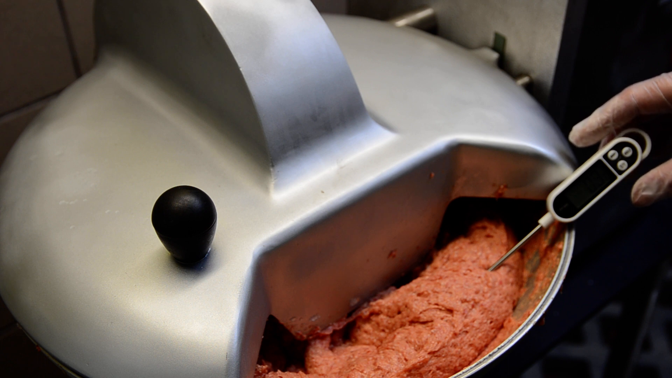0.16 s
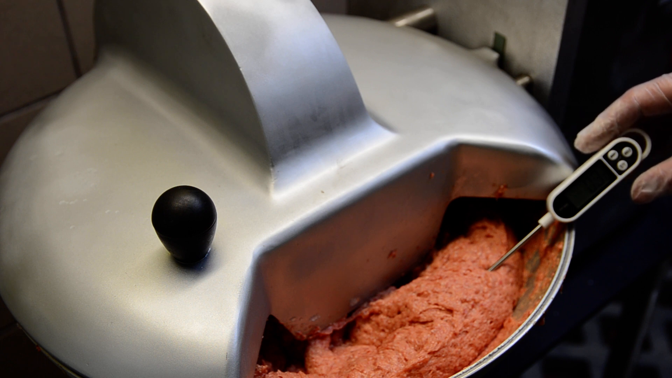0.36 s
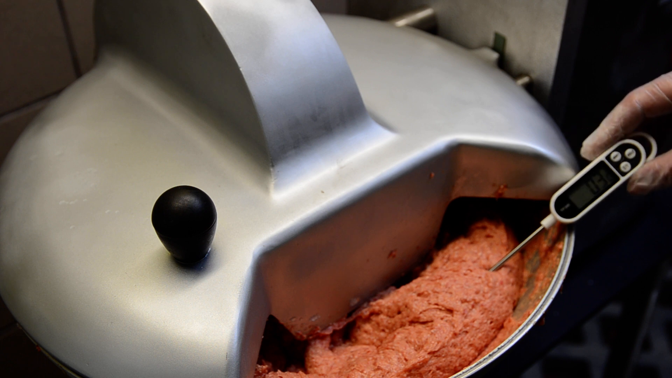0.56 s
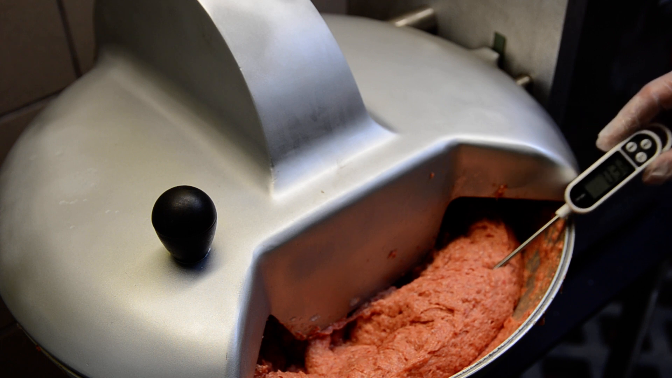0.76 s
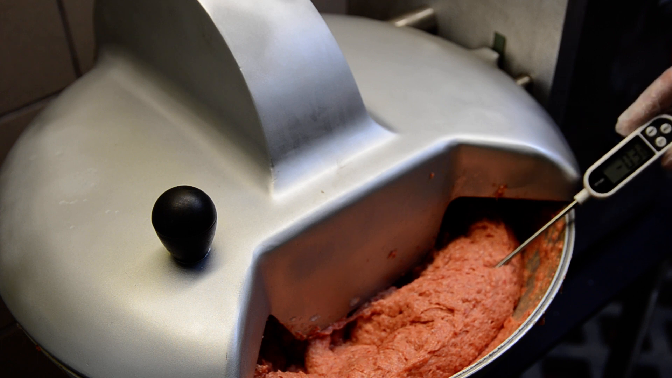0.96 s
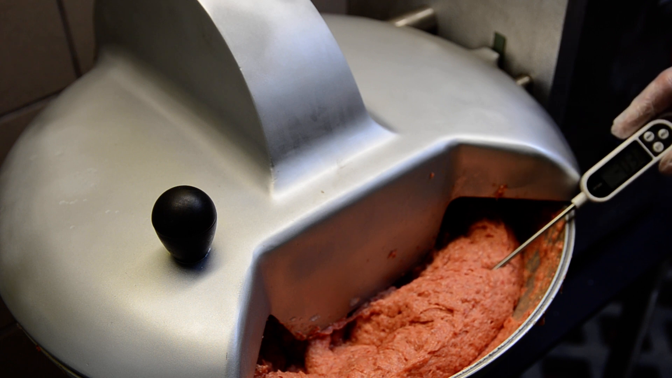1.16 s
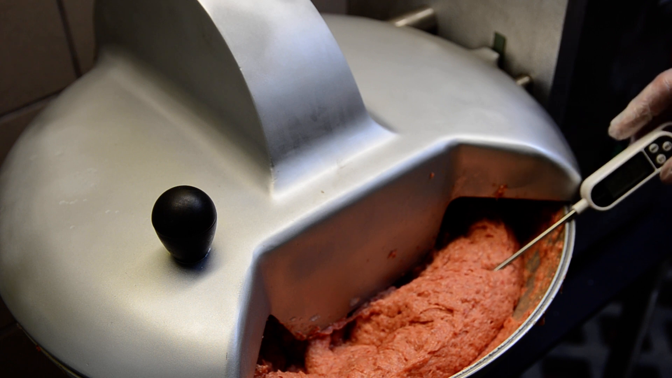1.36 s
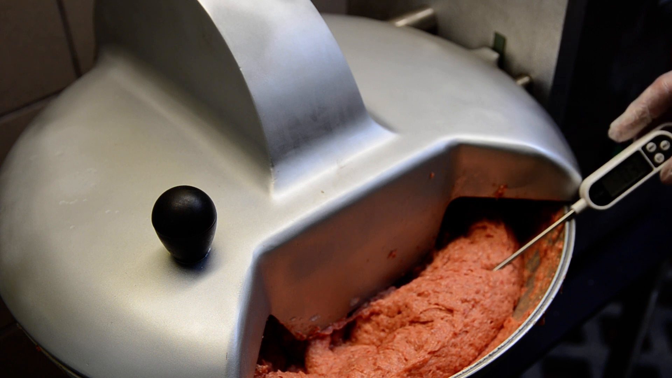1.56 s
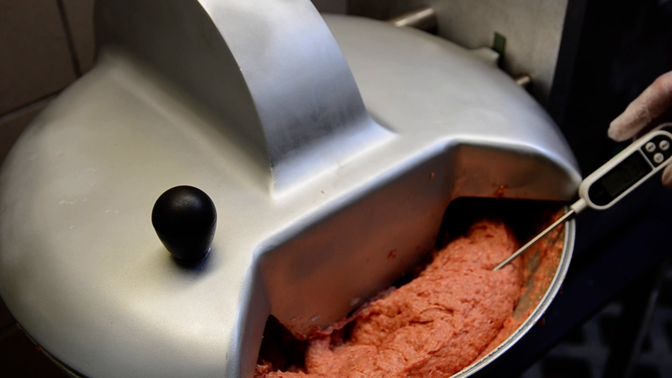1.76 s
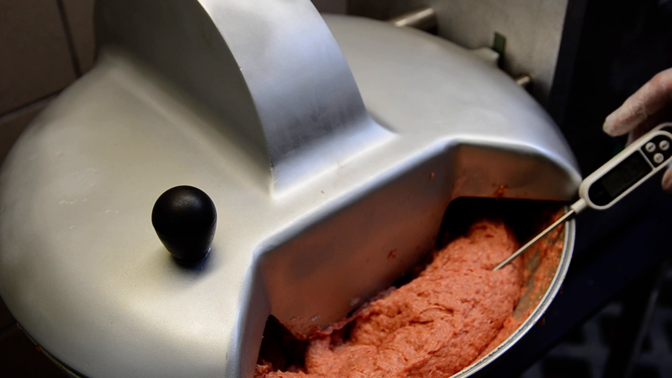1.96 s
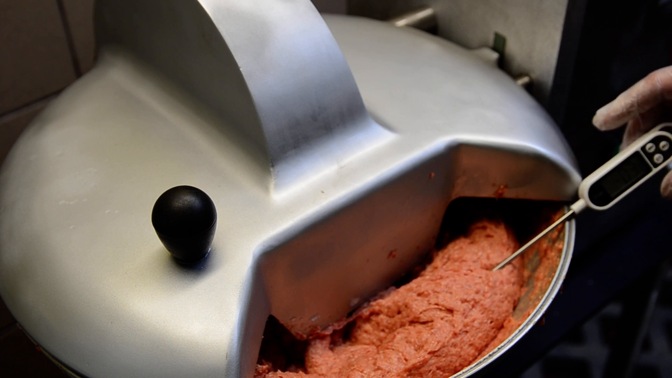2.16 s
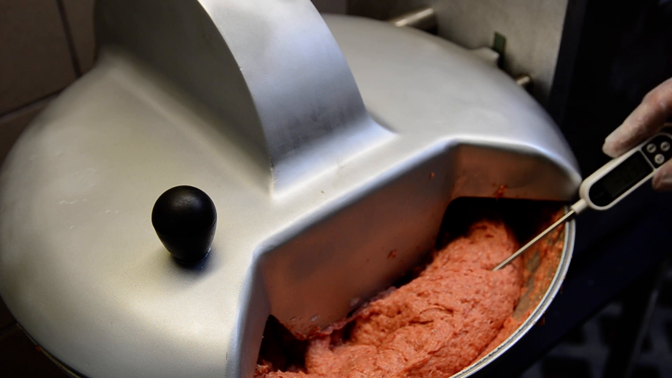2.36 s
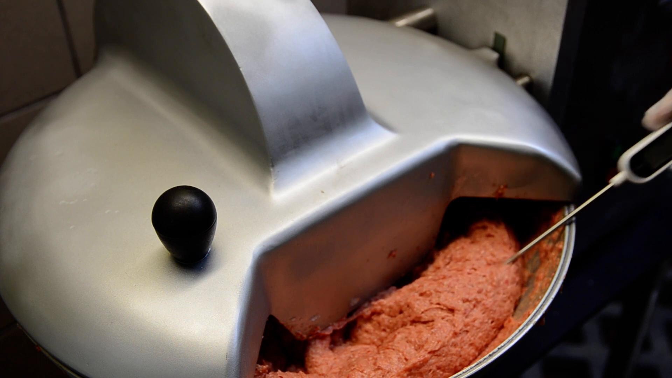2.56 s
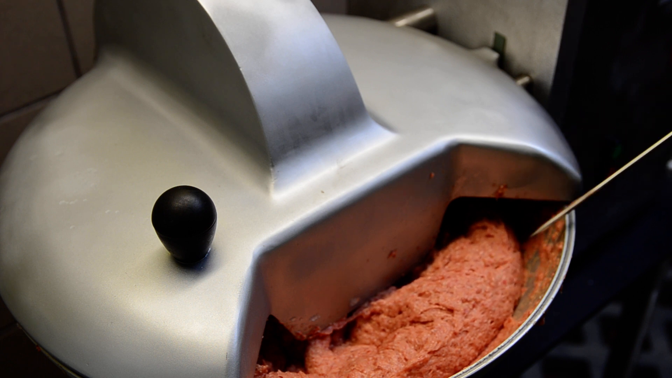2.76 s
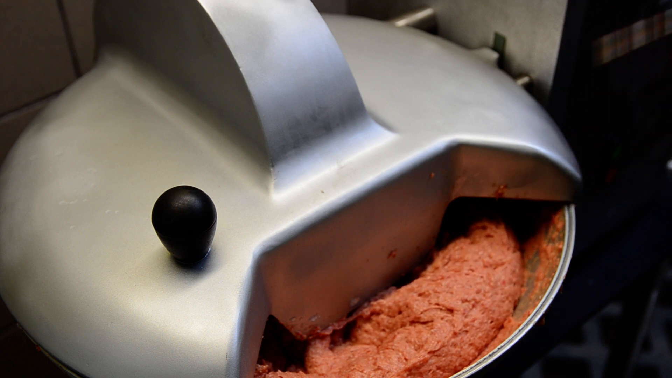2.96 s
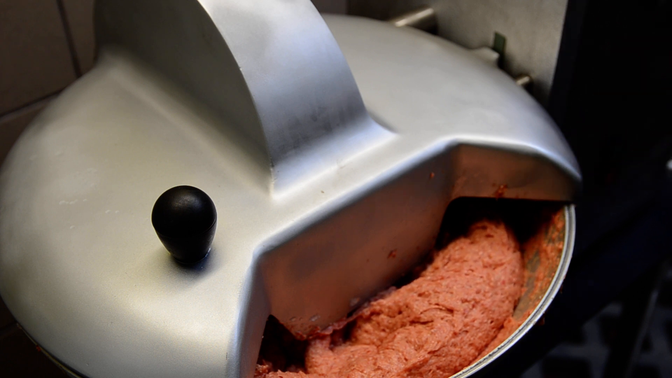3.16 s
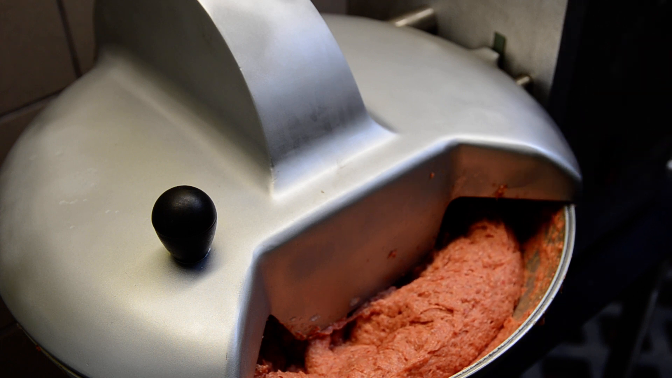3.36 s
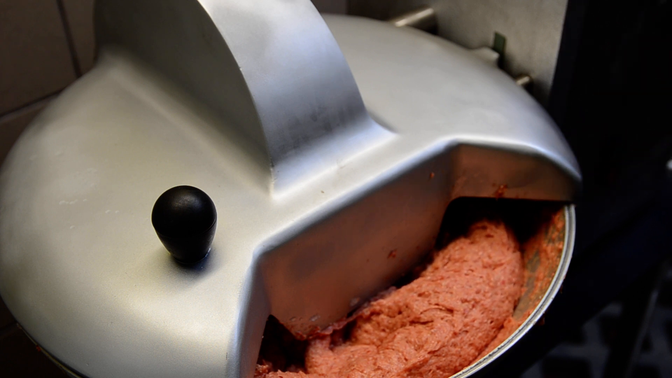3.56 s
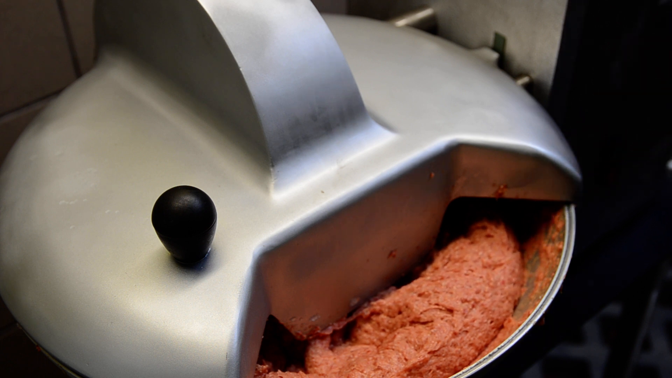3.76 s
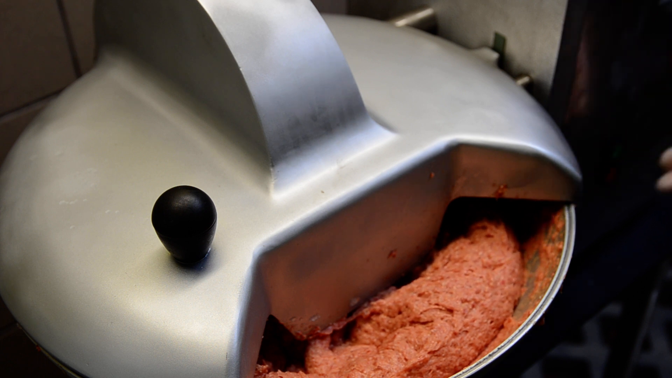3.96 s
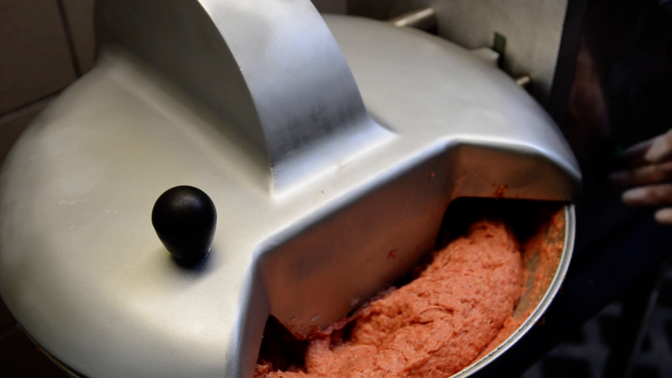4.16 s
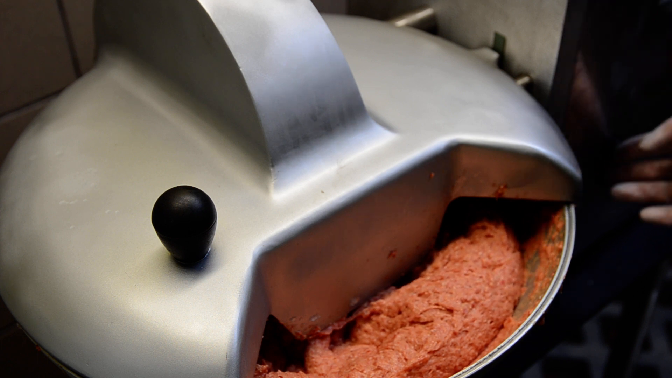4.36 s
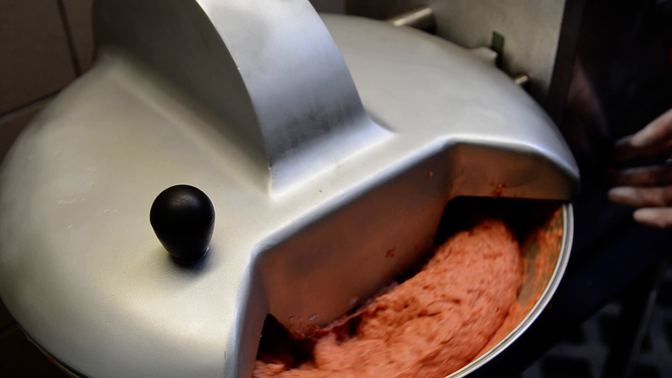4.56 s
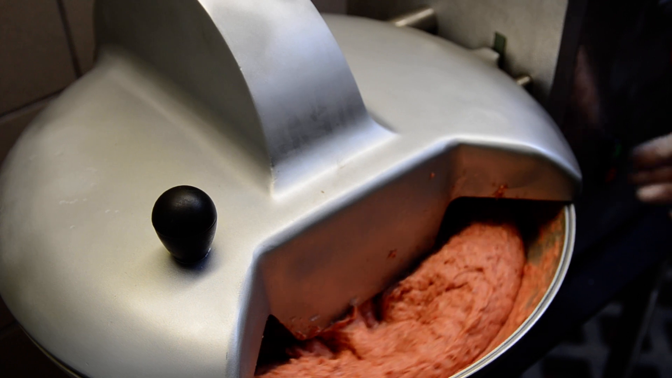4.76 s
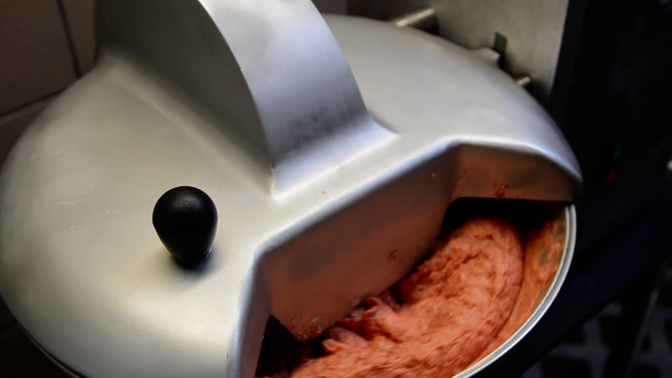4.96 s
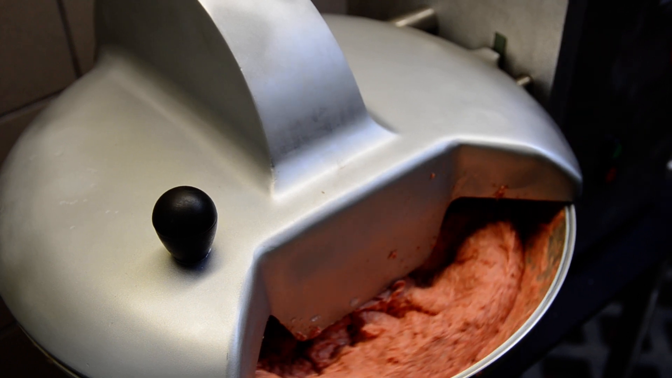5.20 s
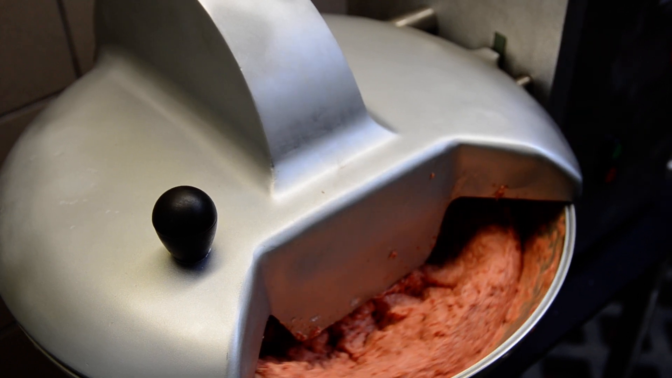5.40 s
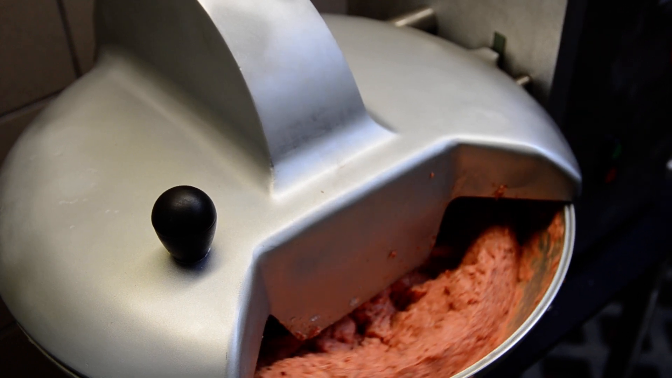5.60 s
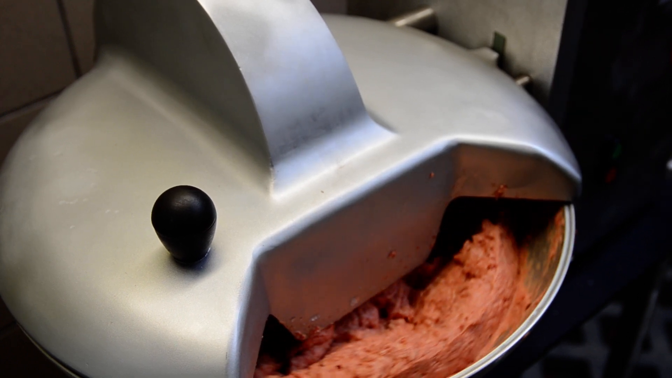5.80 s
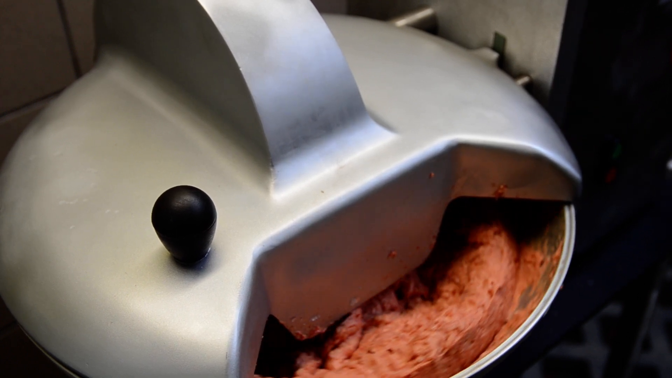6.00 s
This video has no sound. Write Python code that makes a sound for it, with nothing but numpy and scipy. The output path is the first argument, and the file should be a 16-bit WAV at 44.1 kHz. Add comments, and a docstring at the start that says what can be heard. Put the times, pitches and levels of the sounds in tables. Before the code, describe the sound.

Low airy drone first, almost still, with small ticks and a brief far bird warble. One small double tap on a thermometer, then a cluster of soft knocks as it comes to rest on steel. A barely audible button creak leads to a heavy clunk; the cutter's gears instantly roar, its housing and lid ringing harshly, with wet mince hissing underneath. Close microphone, short hard-walled room reverberation.

```python
"""Ventilation drones and a low hum wavers throughout: noise shaped in spectrum and passed through resonances.
Over them fall small dry ticks, band-limited noise bursts, and a far bird warbles in gliding sines.
A probe is tapped, then laid on a steel table: decaying modes struck by noise bursts, with unpitched cracks.
The button of a bowl cutter creaks; a faint dull noise leads to the drive's clunk and squeal; the hum grows.
Rattling gears ring the steel housing and lid while knives and mince hiss and spatter to the end."""
import sys
import numpy as np
from scipy import signal
from scipy.fft import rfft, irfft
from scipy.io import wavfile
from scipy.ndimage import uniform_filter1d

SR = 44100
rng = np.random.default_rng(int(sys.argv[2]) if len(sys.argv) > 2 else 0)


def undo_db(level):
    """Turn decibels back into plain size, where 20 dB means ten times bigger."""
    steps = np.asarray(level, float) / 20
    return 10 ** steps


def wav_out(sig):
    """Save sig, one row per channel (or a flat mono array), as 16-bit PCM at SR to the path in sys.argv[1]."""
    wavfile.write(sys.argv[1], SR, np.round(np.clip(np.atleast_2d(sig).T, -1, 1) * 32767).astype(np.int16))


N = 266364
T = np.arange(N) / SR

# Modes of the cutter housing. Each row: frequency in Hz, typical rms level while running in dB.
HOUSING_MODES = [(132, -43.5), (151, -44), (182, -41), (223, -38.5), (261, -38.5), (336, -45), (409, -52),
                 (450, -50.5), (568, -40), (608, -54), (676, -77), (721, -42.5), (821, -34.5), (902, -22),
                 (923, -22.5), (985, -27.5), (1031, -28.5), (1058, -29), (1096, -26), (1130, -26.5),
                 (1216, -36), (1265, -29.5), (1330, -29.5), (1402, -32), (1448, -40)]
# Modes of the cutter lid. Each row: frequency in Hz, typical rms level while running in dB.
LID_MODES = [(1577, -36.5), (1704, -30), (1766, -35), (1898, -29), (2013, -35), (2064, -33.5),
             (2161, -35.5), (2213, -36), (2304, -30.5), (2492, -39.5), (2568, -33.5), (2641, -37),
             (2719, -35.5), (2748, -38.5), (2880, -38), (3004, -41.5), (3114, -44.5), (3171, -47),
             (3292, -51), (3362, -56), (3669, -68), (3787, -49.5), (3863, -63), (4097, -67), (4194, -50.5),
             (4264, -65.5), (4323, -62), (4468, -71)]
# Spectrum shape of the gear roar. Each row: frequency in Hz, relative density in dB per Hz.
ROAR_SPECTRUM = [(59, -49), (100, -43), (232, -21), (380, -24.5), (670, -11.5), (742, -13), (911, -5.5),
                 (1200, -11.5), (1380, -11), (1500, -13), (2260, -12.5), (2820, -18.5), (3530, -28),
                 (4190, -27), (6000, -58), (7800, -77.5), (13200, -120)]
# Spectrum shape of knives and mince. Each row: frequency in Hz, relative density in dB per Hz.
MINCE_SPECTRUM = [(2710, -29), (4600, -5), (5220, -2.5), (5840, -11), (6270, -10.5), (6870, -11),
                  (9660, -13.5), (13600, -16.5), (15500, -23)]
# Start of the drive: the first row is a faint dull noise just before the clunk, the others the clunk itself.
# Each row: start in seconds, direct peak in dB, burst decay in ms, brightness in dB per octave.
DRIVE_START = [(4.527, -26.5, 11, -9), (4.540, -2.5, 7, 0), (4.551, -13, 4, -2.5), (4.578, -22, 9.3, 2)]
# Modes of the cutter frame. Each row: frequency in Hz, relative peak in dB, 60 dB decay time in seconds.
FRAME_MODES = [(227, -10.5, 0.15), (258, -8.5, 0.18), (335, -9, 0.055), (445, 4, 0.041), (482, 3.5, 0.033),
               (660, -13.5, 0.047), (863, 1.5, 0.028), (1230, -6, 0.023), (1418, -2, 0.026),
               (2037, -6.5, 0.021), (5000, -36, 0.042), (7850, -28, 0.023), (9140, -28, 0.058)]
# Squeal of the slipping drive: start in seconds, frequency in Hz, length in ms, peak in dB.
DRIVE_SLIP = (4.567, 3765.5, 16, -32)
# Push button creaking under the finger: start in seconds, length in seconds, frequency in Hz, rms level in dB.
BUTTON_CREAK = (4.422, .065, 1800, -60)
# Probe coming to rest. Each row: start in seconds, direct peak in dB, contact decay in ms,
# brightness in dB per octave.
TABLE_KNOCKS = [(3.315, -29.5, 28, 2.5), (3.327, -32, 15, -1.5), (3.376, -39, 7.3, -2.5),
                (3.394, -38.5, 8.9, -1)]
# Modes of the steel table. Each row: frequency in Hz, relative peak in dB, 60 dB decay time in seconds.
TABLE_MODES = [(180, -2.5, 0.11), (222, -4.5, 0.16), (470, -10.5, 0.073), (542, -9, 0.082),
               (807, 2.5, 0.071), (950, -25, 0.055), (1390, -10, .05), (1770, -5.5, 0.028),
               (2020, -6.5, 0.035), (2650, -19, .02), (3460, -20, .015), (3820, -17, 0.02),
               (4170, -18, 0.045), (4450, -22, .02)]
# Taps on the probe. Each row: start in seconds, direct peak in dB, contact decay in ms.
PROBE_TAPS = [(1.402, -37.5, 2.8), (1.406, -33.5, 2)]
# Modes of the probe. Each row: frequency in Hz, relative peak in dB, 60 dB decay time in seconds.
PROBE_MODES = [(793, -11, 0.078), (1120, -9, 0.035), (1123, 10, 0.031), (1640, 3, 0.096), (2100, -12, .05),
               (2726, -5.5, 0.042), (3400, -12, 0.036), (5460, -24, 0.027), (1370, -10, 0.033),
               (4100, -23, .05)]
# Unpitched cracks of the taps, knocks and drive clunk, with small dry ticks among them.
# Each row: start in seconds, direct peak in dB, burst decay in ms, band centre in Hz.
CRACKS_AND_TICKS = [(.488, -61, 8.9, 7000), (.6, -66, 10, 7000), (.635, -72, 8, 7000),
                    (1.402, -60, 5, 5000), (1.405, -50, 4, 1400), (3.314, -43, 9, 9000),
                    (3.318, -49, 22, 3400), (3.32, -41.5, 35, 1290), (3.33, -52, 30, 7000),
                    (3.426, -56.5, 22, 9000), (3.481, -53.5, 19, 9000), (3.488, -44.5, 29, 1300),
                    (3.553, -47, 5, 8000), (3.553, -36, 18, 1050), (3.559, -45, 14, 3630),
                    (3.571, -34, 16, 950), (3.6, -41, 14, 990), (4.312, -61, 15, 5000),
                    (4.345, -62, 12, 5000), (4.539, -24, 9, 2600), (4.543, -26.5, 7.3, 8050)]
# Bird notes. Each row: start in seconds, length in seconds, first pitch in Hz, last pitch in Hz,
# reference level in dB for the two partials.
BIRD_NOTES = [(0.74, .165, 4420, 4810, -82), (.89, .065, 4080, 4120, -81), (.958, .075, 4640, 4290, -84),
              (1.045, .11, 4080, 4360, -84)]
# Spectrum shape of the ventilation. Each row: frequency in Hz, relative density in dB per Hz.
AIR_SPECTRUM = [(15, -40), (25, -3.5), (75, -4.5), (104, -17), (148, -16), (221, -8), (289, -19.5),
                (313, -9), (368, -5), (410, -9), (509, -7), (598, -9.5), (944, -5), (1750, -14),
                (5280, -36), (8000, -40.5), (15500, -45)]
# Room resonances in the drone. Each row: frequency in Hz, width in Hz, typical rms level in dB.
ROOM_TONES = [(164, 65, -71), (218.5, 37, -73), (350, 85, -72.5), (527, 38, -73.5), (900, 340, -85),
              (1050, 150, -83.5)]

ROAR_DB, MINCE_DB, AIR_DB = -21, -46, -57  # rms before gating and slow level changes
START_S, MESH_S, TAKE_UP_S, SLACK_DB = 4.54, 4.568, 0.032, -10.5  # the gears mesh and take up the load
KNIFE_BITE_DB, KNIFE_BITE_S = 1, 0.03  # extra level at the start, and its decay time
HUM_HZ, HUM_IDLE_DB, HUM_RUNNING_DB, HUM_RISE_S = 75.1, -68, -54.5, 0.27
SOFTENING_CYCLES = 4.2  # 60 dB decay, in periods of the mode, of the filter ahead of each struck mode
BIRD_BEND = 1.25  # glides start slowly and steepen
ROOM_T60_S, ROOM_DB = 0.42, -9.5  # decay time, and energy of the tail's response
HIGH_PASS_HZ = 122.5


def cutter():
    """Superposition: modal ringing, gear roar and mince noise add once the drive has started."""
    running, load_db = T > START_S, gear_load_db()
    steel = rattling_steel(running, load_db)
    return steel + (gear_roar(load_db) + knives_in_mince()) * running


def gear_load_db():
    """Backlash: meshing is weak while the teeth are slack, then rises to full load."""
    slack = np.clip(1 - (T - MESH_S) / TAKE_UP_S, 0, 1)
    return SLACK_DB * slack


def rattling_steel(running, load_db):
    """Forced resonance: random impacts of the gear teeth drive the modes of housing and lid."""
    teeth = level(grains(6000, 1.5), 0)
    rattle = teeth * undo_db(load_db + 0.28 * walk(25)) * running
    # levels are set over the whole span; this makes them hold for the running part
    share = np.sqrt(np.mean(running))
    steel = np.zeros(N)
    for hz, db in HOUSING_MODES + LID_MODES:
        # the turning bowl shifts how well each mode is driven
        drive = undo_db(db + 1.1 * walk(5)) * share
        # damping widens the upper modes
        steel += drive * steep(rattle, hz, 16 + 0.0078 * hz)
    return steel


def gear_roar(load_db):
    """Broadband radiation: coloured noise whose level follows the gear load and wavers."""
    noise = colour(rng.standard_normal(N), ROAR_SPECTRUM)
    return level(noise, ROAR_DB) * undo_db(load_db + 0.24 * walk(27))


def knives_in_mince():
    """Turbulence and impact: uneven noise and random drops hiss and spatter in the treble."""
    spatter = level(signal.fftconvolve(grains(80, 2), burst(3))[:N], -10)
    slosh = undo_db(0.9 * walk(18))
    wet = colour(rng.standard_normal(N) * slosh + spatter, MINCE_SPECTRUM)
    bite_db = KNIFE_BITE_DB * np.exp(-np.abs(T - START_S) / KNIFE_BITE_S)
    return level(wet, MINCE_DB) * undo_db(bite_db)


def switch():
    """Friction and impact: the button creaks, a dull noise leads to the drive's clunk, and it squeals."""
    s, length_s, hz, db = BUTTON_CREAK
    creak = undo_db(db) * gate(s, length_s, 0.0071) * band(rng.standard_normal(N), hz, 150)
    s, hz, ms, db = DRIVE_SLIP
    swell = np.sin(np.pi * np.clip(1000 * (T - s) / ms, 0, 1))
    squeal = undo_db(db) * np.sin(2 * np.pi * hz * T) * swell
    return creak + squeal + blows(DRIVE_START, FRAME_MODES)


def probe_and_table():
    """Free vibration: the tapped probe and the knocked table ring in their own modes."""
    return blows(PROBE_TAPS, PROBE_MODES) + blows(TABLE_KNOCKS, TABLE_MODES)


def cracks_and_ticks():
    """Band-limited noise: unpitched bursts about an octave and a half wide."""
    out = np.zeros(N)
    for s, peak_db, ms, hz in CRACKS_AND_TICKS:
        sos = signal.butter(2, [0.6 * hz, 1.65 * hz], "band", fs=SR, output="sos")
        add(out, s, signal.sosfilt(sos, burst(ms)), peak_db)
    return out


def bird():
    """Frequency glide: phase sums the moving pitch, with a weaker octave partial above it."""
    out = np.zeros(N)
    for s, length_s, from_hz, to_hz, db in BIRD_NOTES:
        progress = np.clip((T - s) / length_s, 0, 1) ** BIRD_BEND
        phase = 2 * np.pi * np.cumsum(from_hz + (to_hz - from_hz) * progress) / SR
        note = 1.4 * np.sin(phase) + 0.3 * np.sin(2 * phase)
        out += undo_db(db) * gate(s, length_s, 0.015) * note
    return out


def hum():
    """Narrow-band noise: a low hum that wavers, stronger once the motor has run up."""
    db = np.interp(T, [START_S, START_S + HUM_RISE_S], [HUM_IDLE_DB, HUM_RUNNING_DB])
    return undo_db(db) * band(rng.standard_normal(N), HUM_HZ, 4.4)


def ventilation():
    """Room resonance: a broad noise drone in which the room's resonances come and go."""
    swell = undo_db(0.3 * walk(2))
    drone = level(colour(rng.standard_normal(N), AIR_SPECTRUM), AIR_DB) * swell
    for hz, width_hz, db in ROOM_TONES:
        drone += undo_db(db + 2 * walk(3.02)) * band(rng.standard_normal(N), hz, width_hz)
    return drone


def room(x):
    """Reverberation: tiled walls add a decaying noisy tail, duller than the direct sound."""
    t = np.arange(SR // 2) / SR
    dull_noise = signal.lfilter([1], [1, -0.5], rng.standard_normal(len(t)))
    tail = dull_noise * 1000 ** (-t / ROOM_T60_S) * (t > 0.006)
    tail /= np.sqrt(np.sum(tail ** 2))
    return x + undo_db(ROOM_DB) * signal.fftconvolve(x, tail)[:N]


def blows(events, modes):
    """Modal excitation: each noise burst rings all modes of one body, weighted by its brightness."""
    out = np.zeros(N)
    for s, peak_db, ms, *tilt in events:
        push = burst(ms)
        struck = np.zeros(len(push))
        for k, (hz, db, t60) in enumerate(modes):
            # filtering around the mode softens its attack and leaves less energy far from its pitch
            softened = ring(push, hz, SOFTENING_CYCLES / hz)
            mode = ring(softened, hz, t60)
            # neighbouring modes swing in opposite sense, so little is left below the lowest
            size = (-1) ** k * undo_db(db + sum(tilt) * np.log2(hz / 1000))
            struck += size * mode / np.abs(mode).max()
        add(out, s, struck, peak_db)
    return out


def burst(ms):
    """Rough contact: noise that builds within about a millisecond and decays exponentially."""
    t = np.arange(SR // 2) / SR
    return rng.standard_normal(len(t)) * np.exp(-1000 * t / ms) * (1 - np.exp(-t / 0.00069))


def grains(per_s, spread_db):
    """Random impacts: clicks at chance times, of either sign, some larger than the rest."""
    clicks = (rng.random(N) < per_s / SR) * rng.choice([-1, 1], N)
    return clicks * undo_db(spread_db * rng.exponential(size=N))


def ring(x, hz, t60):
    """Damped oscillator: one complex pole decays by 60 dB in t60 seconds."""
    pole = np.exp((2j * np.pi * hz - np.log(1000) / t60) / SR)
    return signal.lfilter([1], [1, -pole], x).imag


def band(x, hz, width_hz):
    """Bandwidth and decay are inverse: a steady drive through one resonance, at rms 1."""
    return level(ring(x, hz, np.log(1000) / (np.pi * width_hz)), 0)


def steep(x, hz, width_hz):
    """Cascaded resonance: two passes leave deep valleys on both sides."""
    return band(band(x, hz, width_hz), hz, width_hz)


def colour(x, points):
    """Spectral filtering: gains in dB are interpolated over log frequency."""
    hz, db = np.transpose(points)
    bins_hz = np.arange(N // 2 + 1) * SR / N
    return irfft(rfft(x) * undo_db(np.interp(np.log(bins_hz + 1), np.log(hz), db)), N)


def walk(rate):
    """Slow random modulation: levels held 1 / rate seconds and smoothed twice; spread near 1."""
    k = int(SR / rate)
    held = np.repeat(rng.standard_normal(N // k + 1), k)
    return 1.3 * uniform_filter1d(uniform_filter1d(held, k), k)[:N]


def gate(s, length_s, edge_s):
    """Amplitude envelope: gain 1 for a span of time, with straight fades inside both ends."""
    return np.clip(np.minimum(T - s, s + length_s - T) / edge_s, 0, 1)


def level(x, db):
    """Root-mean-square scaling: the mean power sets the level."""
    return x * undo_db(db) / np.sqrt(np.mean(x ** 2))


def add(out, s, sound, peak_db):
    """Superposition: a short sound joins at time s with the given peak."""
    i = int(s * SR)
    out[i:i + len(sound)] += (sound * undo_db(peak_db) / np.abs(sound).max())[:N - i]


def scene():
    """Superposition: hand sounds and switch reverberate; cutter, hum, bird and drone join them."""
    hand = probe_and_table() + cracks_and_ticks() + switch()
    # the high-pass removes the low leakage of the resonators
    high_pass = signal.butter(6, HIGH_PASS_HZ, "high", fs=SR, output="sos")
    struck_and_running = signal.sosfilt(high_pass, room(hand) + cutter())
    return (struck_and_running + hum() + bird() + ventilation())[None]


def band_limit(x):
    """A steep low-pass at the top of the band."""
    return signal.sosfilt(signal.butter(12, 15640, fs=SR, output="sos"), x)


def record(dry):
    """Transmission: the finished mix passes on with no further change of level."""
    return band_limit(dry)


dry = scene()
out = record(dry)
wav_out(out)
```